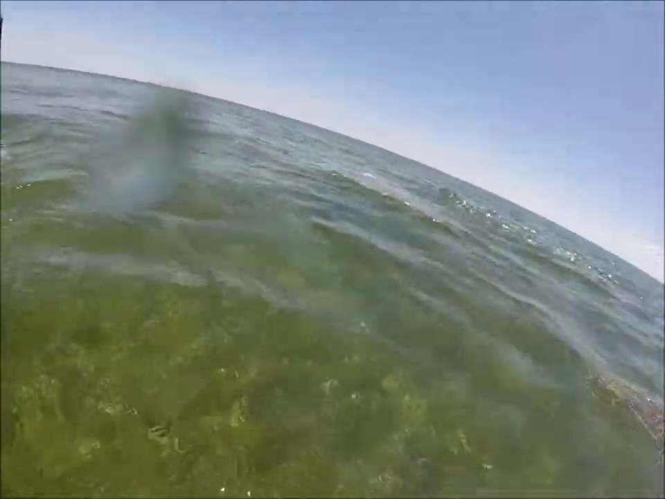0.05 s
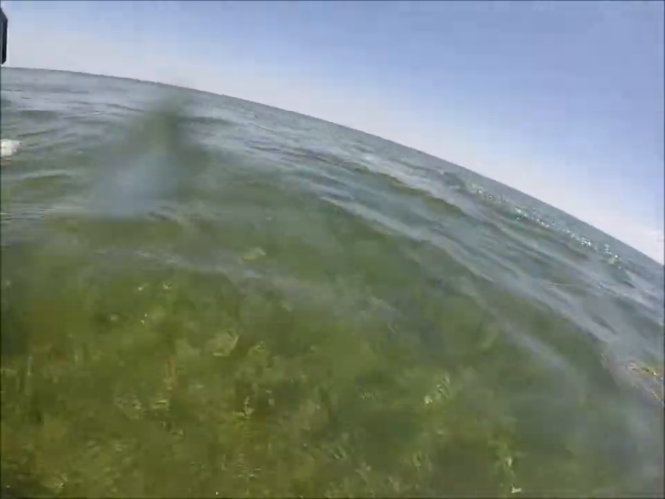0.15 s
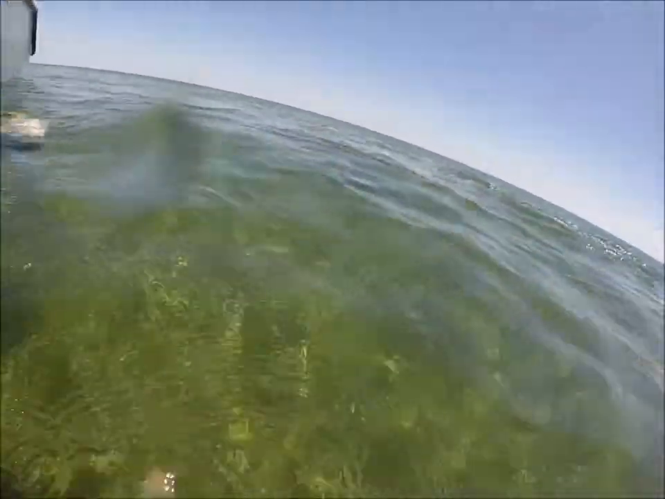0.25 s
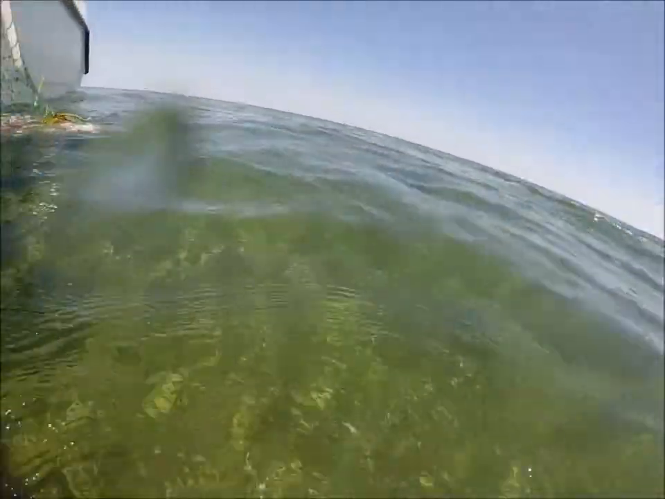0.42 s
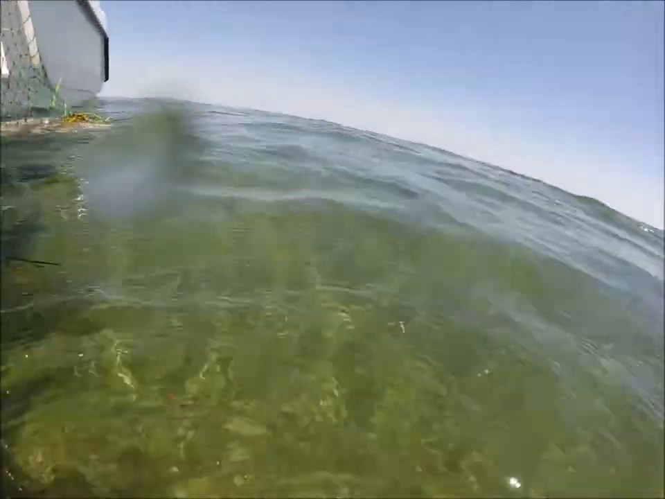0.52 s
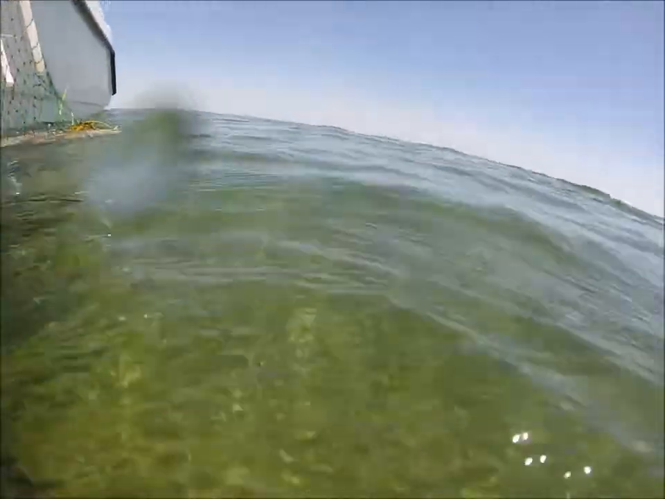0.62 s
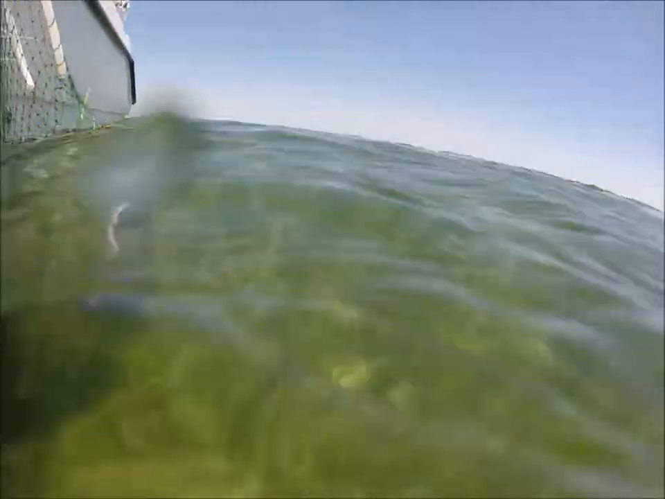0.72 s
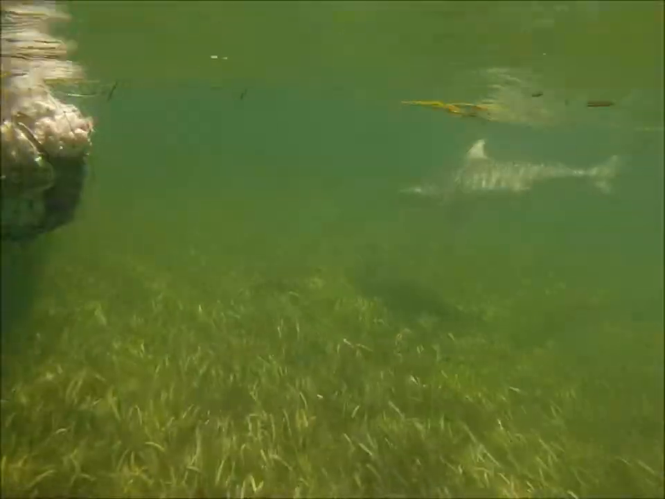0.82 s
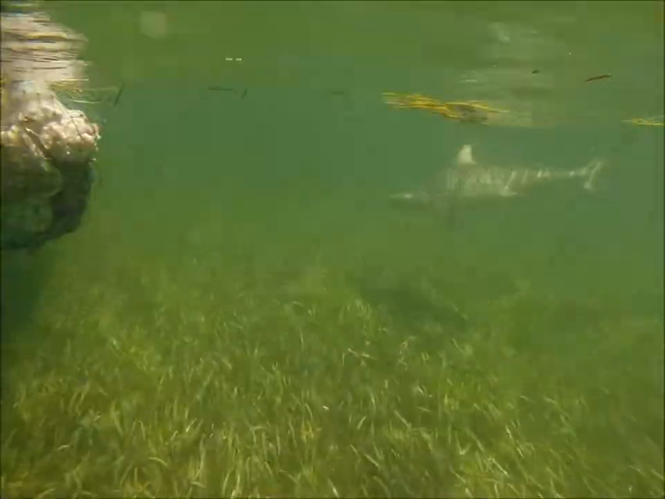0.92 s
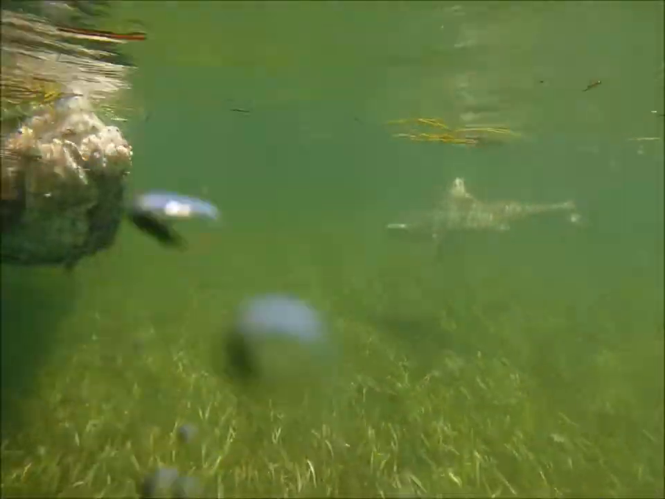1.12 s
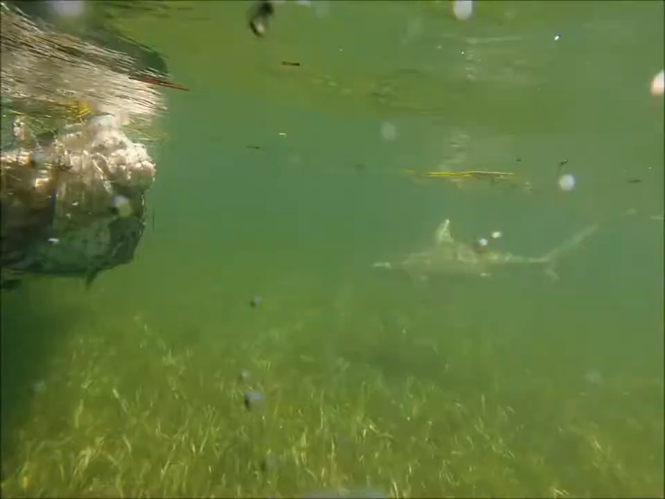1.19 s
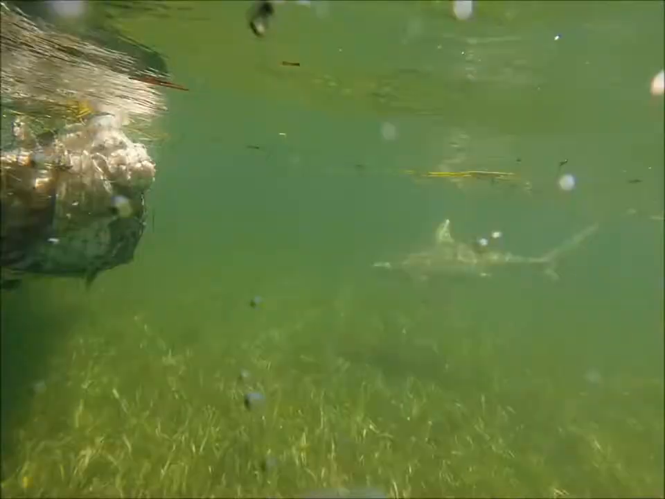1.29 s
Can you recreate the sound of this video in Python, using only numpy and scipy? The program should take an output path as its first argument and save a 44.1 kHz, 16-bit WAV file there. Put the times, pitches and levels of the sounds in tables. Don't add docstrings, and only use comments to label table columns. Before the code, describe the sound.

Water splashing and bubbling around a hollow camera case pushed into the sea. Soft hiss and deep rumble until 0.18 s, then plopping bubbles, froth and low slosh to about 0.42 s. A louder second burst from 0.46 to 0.76 s brings hard gurgles and crisp droplet snaps. Last blips come at 0.84-0.9 s, then muffled quiet with faint bubbles and trickling air until about 1.35 s.

```python
import sys
import numpy as np
from scipy import signal
from scipy.fft import rfft, irfft
from scipy.io import wavfile
from scipy.ndimage import uniform_filter1d

SR = 44100
rng = np.random.default_rng(int(sys.argv[2]) if len(sys.argv) > 2 else 0)


def voltage_ratio(level):
    return 10 ** (np.asarray(level, float) / 20)


def to_wav(s):
    ch = np.atleast_2d(s).T
    pcm = np.round(np.clip(ch, -1, 1) * 32767)
    wavfile.write(sys.argv[1], SR, pcm.astype(np.int16))


N = 59535


def bubble(db, hz, cycles, phase=0, rise=0.0008, swell=1.26):
    cycles = max(cycles, 4)
    turns = np.arange(int(cycles / hz * SR)) * hz / SR
    swelling = np.sin(np.pi / 2 * np.minimum(turns / swell, 1)) ** 2
    ring_down = voltage_ratio(db - 60 * turns / cycles)
    return swelling * ring_down * np.sin(2 * np.pi * (phase + turns * (1 + rise * turns / 2)))


# start in seconds, peak in dB, pitch in Hz,
# cycles the ring takes to fade by 60 dB. The next four tables have the same columns.
FIRST_SHOVE = [(0.1864, -15, 1510, 14), (0.188, -13, 3060, 32), (0.1992, -8, 2650, 37.5),
               (0.2101, -7.5, 2490, 28), (0.2136, -8, 2500, 22), (0.2193, -19.5, 1000, 26),
               (0.2246, -3.5, 1926, 30), (0.227, -6, 1260, 15.5), (0.2363, -6.5, 1000, 55.5),
               (0.2449, -4, 870, -0.5), (0.2742, -4.5, 1040, 7.5), (0.281, -3, 2090, 9.5),
               (0.292, -8.5, 1440, 11), (0.291, -18, 2350, 48), (0.314, -11, 1052, 66.5),
               (0.319, -11, 1432, 25), (0.3503, -9.5, 1990, 29), (0.365, -21, 1900, 29),
               (0.408, -9.5, 2896, 36.5), (0.412, -9, 1970, 15)]
SECOND_SHOVE = [(0.469, -3.5, 2160, 8), (0.473, -17, 1900, 25), (0.5014, -3, 2060, 19),
                (0.507, -3.5, 1104, 25.5), (0.5072, 1.5, 2255, 25.5), (0.51, -11.5, 1850, 36.5),
                (0.5115, -4, 2710, 46), (0.5123, -9.5, 3660, 64), (0.5174, -15, 2026, 86),
                (0.5289, -10.5, 2635, 41), (0.5295, -2, 1750, 10), (0.533, -16, 1526, 32),
                (0.5463, -15, 1197, 34), (0.5756, -1, 2045, 31), (0.5793, -3.5, 2285, 22),
                (0.5893, 3, 1114, 8), (0.6115, -3.5, 1183, 34), (0.6125, 12.5, 1450, 4.5),
                (0.6191, 3, 1560, 23.5), (0.6201, -8, 1149, 33), (0.6301, 5, 2530, 3.5),
                (0.6463, -13, 2280, 43.5)]
GOING_UNDER = [(0.671, -22.5, 1606, 105), (0.679, -3, 1657, 40), (0.6857, -14.5, 2644, 43),
               (0.6888, -16, 571, 38), (0.7003, -10, 1860, 18), (0.7061, 8, 2410, 4.5),
               (0.7089, -3, 1510, 0), (0.7123, -4, 1000, 7), (0.7211, -11, 617, 28.5),
               (0.7389, -8, 670, 15.5), (0.7469, 8, 588, 4), (0.748, -9, 2087, 36), (0.757, -21, 1525, 115),
               (0.7657, -2, 592, 6), (0.7694, -14.5, 950, 22), (0.8015, -11, 1300, 14),
               (0.8344, -18, 2640, 26), (0.8389, -1, 1730, 6), (0.84, -6, 1021, 19), (0.8417, 0, 1830, 8),
               (0.865, -12.5, 2800, 7.5), (0.8931, 2, 2726, 18.5), (0.8981, 4.5, 1552, 10.5),
               (0.8994, -11, 1028, 24), (0.9012, 0, 2070, 8.5), (0.926, -31.5, 1710, 37.5)]
UNDER_WATER = [(0.982, -46.5, 1710, 37), (1.0279, -24.5, 1500, 38), (1.0484, -21, 2367, 49.5),
               (1.0586, -17, 1074, 10), (1.0588, -18, 600, 12.5), (1.0794, -37, 853, 124),
               (1.1198, -17, 600, 15), (1.1331, -34.5, 720, 96.5), (1.1336, -37.5, 1398, 123),
               (1.1683, -32, 676, 56), (1.1868, -41, 697, 110), (1.198, -38, 2620, 64.5),
               (1.2525, -33.5, 1303, 21), (1.313, -46.5, 1480, 54), (1.335, -31.5, 630, 14.5)]
STRAYS = [(0.091, -36, 1000, 14), (0.094, -37, 1580, 15), (0.46, -22, 1300, 22), (.379, -21.5, 1120, 15),
          (.408, -24.5, 680, 18.5), (0.862, -20, 1290, 8), (.876, -38, 2980, 20), (.967, -45, 730, 11),
          (1.076, -49.5, 2500, 38), (1.129, -32, 447, 12.5), (1.158, -40, 1670, 37),
          (1.196, -32.5, 1900, 14.5), (1.222, -39, 793, 14), (1.243, -40.5, 850, 14), (1.28, -59, 643, 5)]


def single_bubbles():
    out = np.zeros(N)
    for s, db, hz, cycles in FIRST_SHOVE + SECOND_SHOVE + GOING_UNDER + UNDER_WATER + STRAYS:
        rise = -0.0011 if s > 1.125 else 0.0008
        add(out, s, bubble(db, hz, cycles, rng.random(), rise))
    return out


# start in seconds, peak in dB, pitch in Hz.
GLUGS = [(.203, -16.5, 290), (.222, -17.5, 90), (.305, -21.5, 41.7), (.348, -14.5, 230), (.475, -20, 72),
         (0.506, -12.5, 205.8), (.543, -11, 224.5), (.615, -26, 104.7), (0.661, -19.5, 61.6),
         (0.837, -27, 168), (0.721, -28.5, 186)]


def glugs():
    out = np.zeros(N)
    for s, db, hz in GLUGS:
        add(out, s, bubble(db, hz, 18.5 * np.sqrt(hz / 208.6)))
    return out


# start in seconds, peak in dB, pitch in Hz.
SNAPS = [(0.364, -32, 4040), (0.4121, -33, 5900), (0.4698, -31.5, 4800), (0.4984, -26, 5200),
         (0.4987, -14.5, 4740), (0.5099, -33, 4340), (0.517, -23.5, 5680), (0.5304, -34, 4290),
         (0.5652, -22.5, 5440), (0.607, -21, 4750), (0.617, -21.5, 5100), (0.6317, -21.5, 6000),
         (0.65, -27.5, 4820), (0.6712, -20, 5570), (0.6789, -14, 8900), (0.6865, -7, 9300),
         (0.6947, -9, 8260), (0.7078, -12.5, 4260), (0.7196, -14.5, 8100), (0.7345, -26.5, 4600),
         (0.7512, -16, 6070), (0.841, -27, 6300), (0.866, -40, 4000), (0.895, -14, 7300),
         (0.9005, -10, 5600), (1.0282, -30, 6200)]


def snaps(spray):
    out = np.zeros(N)
    jet_centre_s, jet_width_s, jet_db = 0.7107, 0.027, -36
    jet_shape = np.exp(-((np.arange(N) / SR - jet_centre_s) / jet_width_s) ** 2)
    spray_level = voltage_ratio(jet_db + 4.76 * drift(99)) * jet_shape
    for s, db, hz in SNAPS:
        add(out, s, bubble(db + 2, hz, 30.8))
        add(spray_level, s, voltage_ratio(db - 19) * puff_shape())
    return out + spray_level * spray


# start in seconds, peak in dB, pitch in Hz.
TICKS = [(0.2153, -48, 8500), (0.2362, -17, 3600), (.287, -45, 5960), (0.2885, -43, 4770),
         (0.308, -52, 4800), (0.3208, -43, 5270), (.335, -46, 7500), (.347, -38.5, 6100),
         (0.378, -43, 4500), (0.4082, -34.5, 5600), (0.501, -24, 10900), (0.509, -32, 8400),
         (.512, -24.5, 8850), (.5175, -30, 12500), (0.566, -33.5, 12500), (.576, -44, 12000),
         (.587, -49, 8500), (0.6112, -23, 4850), (0.6195, -32, 8600), (.647, -36, 8700),
         (0.652, -47, 12000), (0.673, -29, 7500), (0.743, -43, 11000), (.761, -44, 6000),
         (0.7744, -41, 8900), (0.7864, -38, 7940), (.7865, -44, 4820), (0.825, -56, 6000),
         (.833, -44, 6050), (.85, -38, 8100), (.8555, -37, 6800), (0.904, -20.5, 13400), (0.954, -60, 4450),
         (.9672, -44, 3860), (1.048, -56, 6000), (1.116, -44, 3600), (1.146, -48.5, 6130),
         (1.1947, -42, 5720), (1.205, -47, 9300), (1.2421, -49, 3410)]


def ticks(spray):
    out, shape = np.zeros(N), puff_shape()
    span = 1.39
    for s, db, hz in TICKS:
        add(out, s, bubble(db, hz, 54, swell=4.3))
        puff = band(np.resize(spray[int(s * SR):], len(shape)), hz / span, hz * span)
        add(out, s, voltage_ratio(db - 12.5) * shape * puff)
    return out


def puff_shape():
    t = np.arange(SR // 40) / SR / 0.0011
    return t * np.exp(1 - t)


def ragged_spray():
    edges_hz = np.geomspace(3300, 12950, num=8)
    spray = np.zeros(N)
    for low_hz, top_hz in zip(edges_hz, edges_hz[1:]):
        spray += voltage_ratio(7.5 * drift(90)) * band(rng.standard_normal(N), low_hz, top_hz)
    return rms_one(spray)


def swarm(per_s, low_hz, top_hz, cycles):
    strength = voltage_ratio(4 * np.minimum(rng.exponential(1, N), 4)) * rng.choice([-1, 1], N)
    born = rng.random(N) < per_s / SR
    dealt = rng.integers(0, 16, N)
    out = np.zeros(N)
    for k, hz in enumerate(np.geomspace(low_hz, top_hz, num=16)):
        kicks = np.sqrt(hz) * strength * born * (dealt == k) + 1e-18
        r = voltage_ratio(-60 * hz / (cycles * SR))
        w = 2 * np.pi * hz / SR
        out += signal.lfilter([0, np.sin(w)], [1, -2 * r * np.cos(w), r * r], kicks)
    return rms_one(band(out, low_hz * 0.76, top_hz * 0.94, order=4))


def froth(froth_db):
    foam = swarm(per_s=1600, low_hz=600, top_hz=3145, cycles=28.5)
    fizz = swarm(per_s=610, low_hz=3145, top_hz=5770, cycles=30)
    return voltage_ratio(froth_db) * (foam + voltage_ratio(-25) * fizz)


def trickle():
    return sunk() * voltage_ratio(-54.5) * swarm(per_s=160, low_hz=431, top_hz=1000, cycles=26)


def case(x):
    t = np.arange(SR // 8) / SR
    tail = band(rng.standard_normal(len(t)), 600, 2820, order=3) * voltage_ratio(-60 * t / 0.034)
    return voltage_ratio(-19) * signal.fftconvolve(x, tail / np.sqrt(np.sum(tail ** 2)))[:N]


# time in seconds, slosh in dB, froth in dB.
STIR = [(0, -47.5, -57.5), (0.177, -53.5, -60.5), (.192, -24, -39), (0.241, -21.5, -17.5),
        (0.26, -23.5, -45.5), (0.289, -23.5, -32.5), (.36, -33.5, -32), (.40, -39, -54.5),
        (0.454, -46, -53), (.47, -24.5, -33.5), (.52, -24.5, -27.5), (.59, -23.5, -35), (0.654, -33.5, -49),
        (0.704, -25, -25.5), (0.771, -36.5, -37), (.81, -55, -54.5), (.90, -46, -45.5), (0.949, -56, -63)]


def stir():
    s, slosh_db, froth_db = np.transpose(STIR)
    t = np.arange(N) / SR
    return np.interp(t, s, slosh_db), np.interp(t, s, froth_db)


def slosh(stir_db):
    hum_hz, hum_width_hz = 208.6, 47.3
    thump = band(rng.standard_normal(N), hum_hz * 0.43, 300)
    hum = band(rng.standard_normal(N), hum_hz - hum_width_hz / 2, hum_hz + hum_width_hz / 2)
    return voltage_ratio(stir_db - 4.5 + 3.5 * drift(28)) * evened(thump + 1.7 * hum)


# time in seconds, level in dB.
SWELL = [
    (0, 3.5),
    (.2, 1.5),
    (.4, -1),
    (.6, -0.5),
    (.7, 3.5),
    (.8, -7.5),
    (.93, -4.5),
    (1.05, 2),
    (1.35, 0),
]


def rumble(stir_db):
    deep = evened(band(rng.standard_normal(N + SR), 22.16, 72.3, order=3)[SR:])
    follow_db = 0.16 * (stir_db - stir_db.mean())
    swell_db = np.interp(np.arange(N) / SR, *np.transpose(SWELL))
    return voltage_ratio(-35 + follow_db + 3 * drift(6.2) - 5 * under() + swell_db) * deep


# frequency in Hz, level in dB per Hz.
AIR = [
    (59, -21),
    (100, -9),
    (170, -29.5),
    (234, -23),
    (343, -34.5),
    (1030, -37.5),
    (4110, -39.5),
    (16000, -57),
]


def air():
    hz = np.maximum(np.arange(N // 2 + 1) * SR / N, 1)
    at_hz, db = np.transpose(AIR)
    colour = voltage_ratio(np.interp(np.log(hz), np.log(at_hz), db)) * (hz > 80)
    hiss = rms_one(irfft(rfft(rng.standard_normal(N)) * colour, N))
    dull = signal.sosfilt(signal.butter(1, 5000, fs=SR, output="sos"), hiss)
    dull = dull * voltage_ratio(4 * drift(9.5))
    return (hiss + sunk() * (dull - hiss)) * voltage_ratio(-56 - 6.5 * under())


def under():
    return np.clip((np.arange(N) / SR - 0.67) / 0.035, 0, 1)


def sunk():
    return np.clip((np.arange(N) / SR - 0.898) / 0.037, 0, 1)


def rms_one(x):
    return x / np.sqrt(np.mean(x ** 2) + 1e-20)


def drift(rate_hz):
    r = np.exp(-2 * np.pi * rate_hz / SR)
    return rms_one(signal.lfilter([1], [1, -2 * r, r * r], rng.standard_normal(N + SR))[SR:])


def evened(x):
    power = uniform_filter1d(x ** 2, size=int(0.04 * SR))
    return rms_one(x / np.sqrt(power + 0.1 * np.mean(x ** 2)))


def band(x, low_hz, top_hz, order=2):
    return signal.sosfilt(signal.butter(order, [low_hz, top_hz], "band", fs=SR, output="sos"), x)


def add(out, s, piece):
    i = int(s * SR)
    out[i:i + len(piece)] += piece[:len(out) - i]


def scene():
    stir_db, froth_db = stir()
    spray = ragged_spray()
    bubbles = single_bubbles() + glugs()
    droplets = snaps(spray) + ticks(spray)
    water = bubbles + droplets + froth(froth_db) + trickle()
    return (water + case(water) + slosh(stir_db) + rumble(stir_db) + air())[None]


def band_limit(x):
    return signal.sosfilt(signal.butter(12, 16460, fs=SR, output="sos"), x)


def record(dry):
    rounded = 1.25 * np.tanh(dry / 1.333)
    mix = signal.sosfilt(signal.cheby2(12, 70, 16900, fs=SR, output="sos"), rounded)
    return band_limit(mix)


dry = scene()
out = record(dry)
to_wav(out)
```